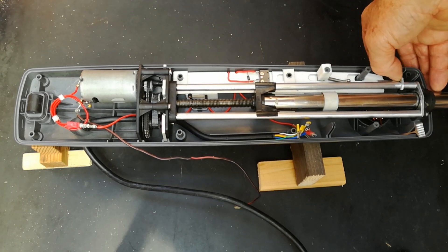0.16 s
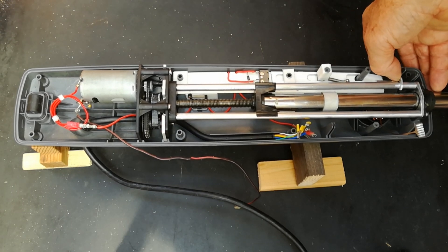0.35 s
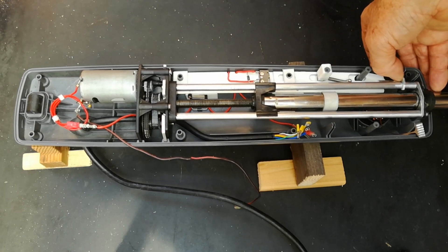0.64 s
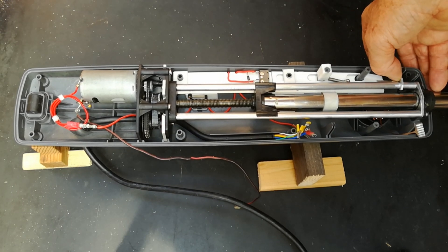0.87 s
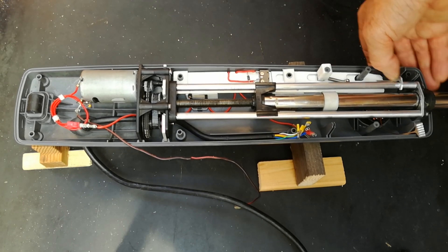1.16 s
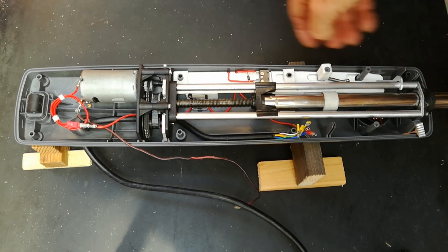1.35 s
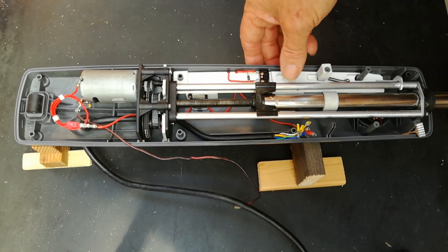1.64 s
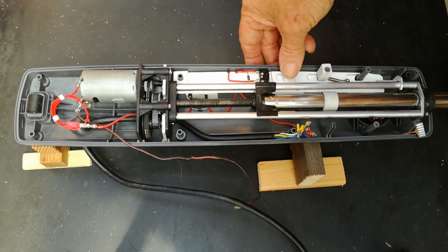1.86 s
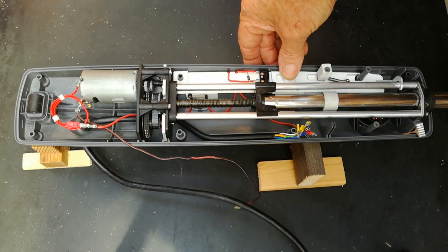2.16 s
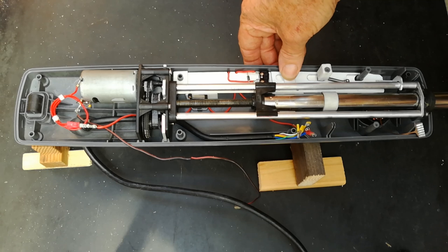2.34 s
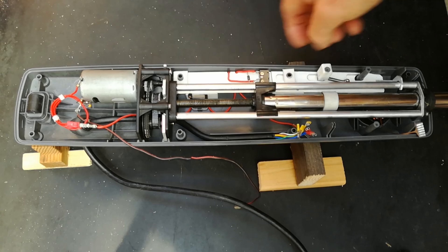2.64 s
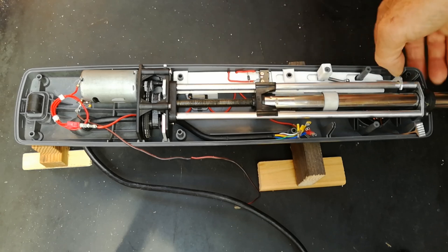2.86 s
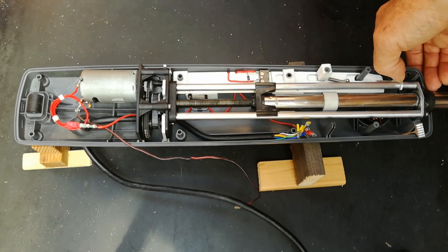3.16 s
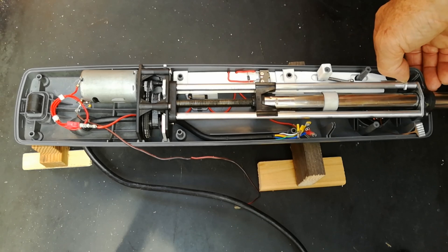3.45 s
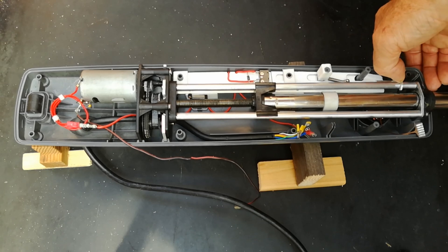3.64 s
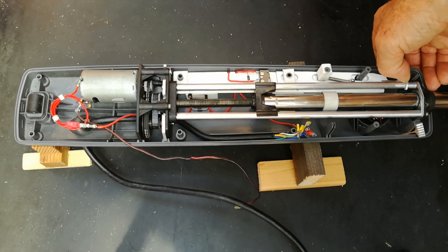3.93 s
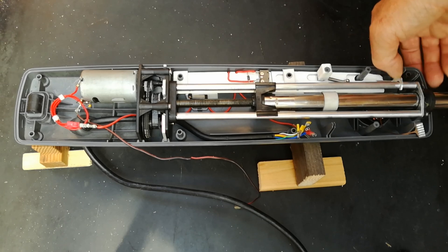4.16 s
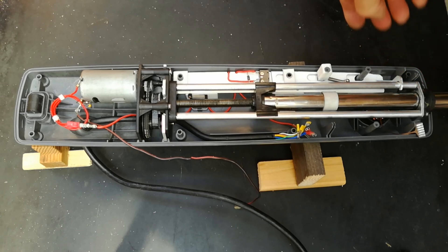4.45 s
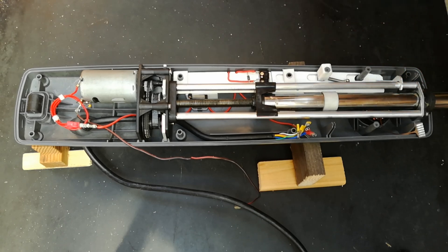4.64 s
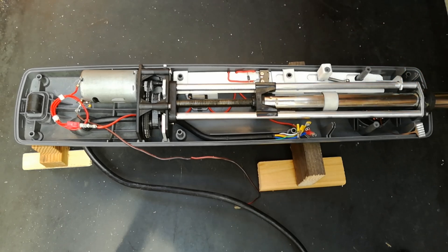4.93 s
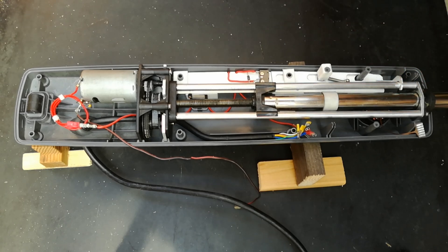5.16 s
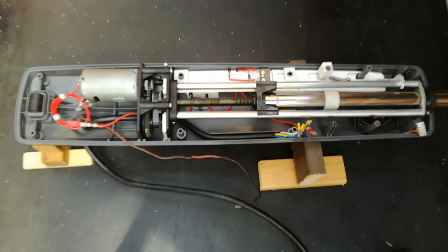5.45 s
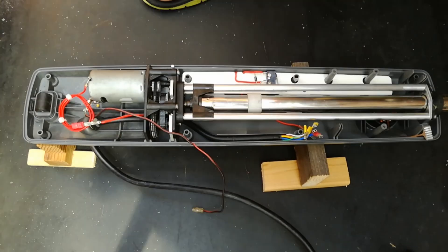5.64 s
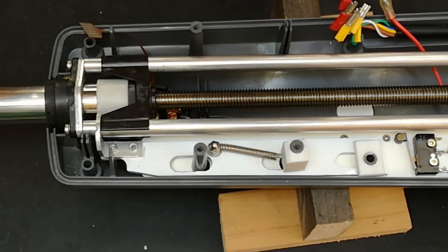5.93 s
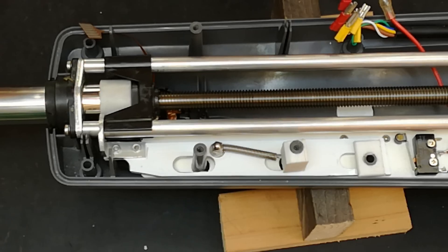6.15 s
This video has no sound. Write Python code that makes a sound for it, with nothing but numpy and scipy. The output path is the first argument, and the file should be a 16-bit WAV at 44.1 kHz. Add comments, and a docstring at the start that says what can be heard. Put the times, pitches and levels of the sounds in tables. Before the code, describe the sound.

A finger pushes a sliding plate, scraping and snapping repeatedly; after quiet and handling thumps, a small electric gear motor whirs up and down.

```python
"""Scrapes and sharp snaps come first: a finger pushes the sliding plate of an opened tiller drive on a workbench.
The plate rubs as filtered noise; snaps, ticks and knocks strike banks of resonances, among faint thin whistles.
Bumps and low thumps follow on the phone above, and the sound drops out for a moment.
Then the motor starts: a gliding tooth-mesh whine and rattle, speeding up and slowing.
A small room adds a short tail and one soft echo, over a quiet bed of murmur and hiss."""
import sys
import numpy as np
from scipy import signal
from scipy.fft import rfft, irfft, next_fast_len
from scipy.io import wavfile
from scipy.ndimage import uniform_filter1d

SR = 44100
rng = np.random.default_rng(int(sys.argv[2]) if len(sys.argv) > 2 else 0)


def pcm_store(signal):
    """Save signal as 16-bit PCM."""
    levels = np.round(np.clip(np.atleast_2d(signal), -1, 1) * 32767)
    wavfile.write(sys.argv[1], SR, levels.astype(np.int16).T)


N = 277830
TIME = np.arange(N) / SR
HIT = TIME[:8192]  # time axis of one short sound


def amp(db):
    """Decibels to gain."""
    return 10 ** (np.asarray(db) / 20)


def unit(x):
    """Scale to rms 1."""
    return x / np.sqrt(np.mean(x ** 2))


def blow(x):
    """Scale a hit to the energy of 10 ms at rms 1."""
    energy = np.mean(np.sum(x ** 2, axis=-1))
    return x * np.sqrt(.01 * SR / energy)


def pan(db):
    """Left and right gains of constant power; db is left minus right."""
    return unit(amp([[db / 2], [-db / 2]]))


def add(out, s, x):
    """Mix a short sound in at time s."""
    i = int(s * SR)
    out[:, i:i + x.shape[-1]] += x[..., :N - i]


def colour(x, points):
    """Causal minimum-phase filter through (Hz, dB) points."""
    n = next_fast_len(x.shape[-1] + 2048, True)
    hz, db = np.transpose(points)
    bin_hz = np.arange(n // 2 + 1) * SR / n
    log_gain = np.log(amp(np.interp(np.log(bin_hz + 1), np.log(hz), db)))
    # folding the cepstrum onto positive time makes the filter causal
    cepstrum = irfft(log_gain, n) * (1 + np.sign(n / 2 - np.arange(n)))
    cepstrum[0] /= 2
    response = np.exp(rfft(cepstrum))
    return irfft(rfft(x, n) * response, n)[..., :x.shape[-1]]


def ring(x, modes):
    """Sum of resonances (Hz, width Hz, dB) driven by x."""
    total = 0
    for hz, width_hz, db in modes:
        b, a = signal.iirpeak(min(hz, .45 * SR), hz / width_hz, SR)
        total = total + amp(db) * signal.lfilter(b, a, x + 1e-18)
    return total


def lowpass(x, hz, order=2):
    """Remove the treble above hz."""
    sos = signal.butter(order, min(hz, .45 * SR), fs=SR, output="sos")
    return signal.sosfilt(sos, x + 1e-18)


def noise(n, alike_hz):
    """White noise at two ports: alike well below alike_hz, unrelated well above."""
    mid, side = rfft(rng.standard_normal((2, n)))
    bin_hz = np.arange(n // 2 + 1) * SR / n
    alike = 1 / (1 + (bin_hz / alike_hz) ** 2)
    opposite = np.array([[1], [-1]])
    return irfft(mid * np.sqrt(1 + alike) + side * np.sqrt(1 - alike) * opposite, n)


def room(x, wet_db, echo_db, t60_s, treble_t60_s=0.064, echo_s=.031, build_s=0.0034):
    """Bench and walls scatter the sound into a short tail; the ceiling returns one soft echo."""
    scatter = noise(2 * len(HIT), alike_hz=900)
    t = TIME[:scatter.shape[1]]
    low = lowpass(scatter, 2800, order=1)
    treble = scatter - low
    tail = low * amp(-60 * t / t60_s) + treble * amp(-60 * t / treble_t60_s)
    tail = tail * (1 - np.exp(-t / build_s))
    echo = low * np.exp(-((t - echo_s) / 0.0088) ** 2)
    response = (amp(wet_db) * unit(tail) + amp(echo_db) * unit(echo)) / np.sqrt(len(t))
    return x + signal.fftconvolve(x, response, axes=1)[:, :N]


# tone of the quiet air: frequency_hz, gain_db
AIR_COLOUR = [(12, -37), (20, -4.5), (49, -3), (101, -9), (149, -11), (226, -15.5), (307, -16), (417, -25),
              (1080, -18.5), (1310, -22.5), (1420, -21.5), (1880, -25), (4710, -29), (8220, -37.5),
              (15600, -39.5)]
AIR_DB, HISS_DB = -65.5, -89.0


def background():
    """The quiet workshop: a low murmur of air that wavers slightly, and a thin steady hiss."""
    waver_db = .6 * np.interp(TIME, np.arange(64) / 10, rng.standard_normal(64))
    air = unit(colour(noise(N, alike_hz=256), AIR_COLOUR)) * amp(AIR_DB + waver_db)
    return air + amp(HISS_DB) * rng.standard_normal((2, N))


def swell(crest_s, db, rise_s, fall_s):
    """A rounded rise to a crest and a rounded fall."""
    t = TIME - crest_s
    return amp(db) * np.exp(-(t / np.where(t < 0, rise_s, fall_s)) ** 2)


# the phone rocks: start_s, level_db, pitch_hz, decay_s, right_port_lag_s
PHONE_THUMPS = [(5.3681, -28, 63, 0.012, 0.00069), (5.389, -38.5, 74, .016, .0018),
                (5.388, -38.5, 423, .008, 0.003)]
# low swells of air and handling: crest_s, level_db, rise_s, fall_s
RUMBLE_SWELLS = [(1.44, -46, 0.06, 0.075), (4.15, -55.5, .025, 0.084), (5.42, -50, .012, 0.18)]


def handling():
    """The phone rocks on its mount in decaying sines; moving air and handling rumble as low noise."""
    out = np.zeros((2, N))
    for s, db, hz, decay_s, lag_s in PHONE_THUMPS:
        t = np.maximum(HIT - np.array([[0], [lag_s]]), 0)
        add(out, s, amp(db) * np.sin(2 * np.pi * hz * t) * np.exp(-t / decay_s))
    rumble_colour = [(20, -8), (45, -1), (58, -4), (75, -14.5), (130, -28), (400, -45.0), (2000, -87)]
    rumble = unit(colour(rng.standard_normal(N), rumble_colour))
    return out + rumble * sum(swell(*row) for row in RUMBLE_SWELLS)


# fingers bump the phone: start_s, level_db, decay_s, centre_hz, width_hz, left_minus_right_db
PHONE_BUMPS = [(5.3655, -40, 0.0024, 1200, 3000, 10), (5.3756, -27.5, 0.000093, 8500, 3500, -38),
               (5.376, -41.5, 0.0014, 2200, 4000, 9), (5.3876, -48.5, .0012, 1000, 1510, 7.5),
               (5.3906, -39.5, 0.0028, 2970, 4990, 16), (5.3918, -34, 0.0061, 1290, 2500, 14),
               (5.3956, -26.5, 0.00018, 5530, 4470, -23)]
# resonances of the phone's case: centre_hz, width_hz, gain_db
PHONE_CASE_MODES = [(1230, 39, 4), (3400, 18, -4.5), (4020, 16, 0.5), (5290, 23, 3), (9900, 22, -13.5)]


def bumps(ring_db=-21, strike=6):
    """Fingers strike and scuff right at the microphone ports; the phone's case rings."""
    out = np.zeros((2, N))
    for s, db, decay_s, hz, width_hz, pan_db in PHONE_BUMPS:
        scuff = noise(len(HIT), alike_hz=500) * np.exp(-HIT / decay_s)
        force = strike * signal.unit_impulse(len(HIT)) + scuff
        click = blow(lowpass(ring(force, [(hz, width_hz, 0)]), 11500, order=4))
        case = blow(ring(force, PHONE_CASE_MODES))
        add(out, s, amp(db) * (pan(pan_db) * click + amp(ring_db) * case))
    return out


# faint thin whistles, source unclear: start_s, end_s, level_db, top_pitch_hz
FAINT_WHISTLES = [(.47, .61, -75, 3780), (0.907, 1.067, -75, 3330), (1.528, 1.658, -74, 3900),
                  (1.691, 1.76, -76, 3970), (1.781, 1.917, -83, 4000), (2.391, 2.512, -70.5, 3770),
                  (3.511, 3.648, -71, 2360), (3.506, 3.638, -70, 3280), (3.587, 3.696, -66, 3850)]


def whistles(flutter_hz=90, pan_db=-3, arch=.035):
    """Thin fluttering tones whose pitch arches up a little as they swell."""
    out = np.zeros((2, N))
    for start, end, db, hz in FAINT_WHISTLES:
        arc = np.sin(np.pi * np.minimum(HIT / (end - start), 1))
        phase = 2 * np.pi * np.cumsum(hz * (1 + arch * (arc - 1))) / SR
        flutter = unit(lowpass(rng.standard_normal((2, len(HIT))), flutter_hz))
        add(out, start, amp(db) * pan(pan_db) * arc * unit(flutter * np.sin(phase)))
    return out


# light metal ticks: start_s, level_db, ring_hz
METAL_TICKS = [(.070, -67, 1880), (2.523, -57.5, 3950), (2.526, -59, 2000), (3.145, -67, 3550),
               (5.818, -65.5, 4850), (5.842, -63, 4740), (5.868, -67.5, 5000)]


def ticks(contact_s=0.0078, width_hz=300, housing_db=-3, pan_db=-2):
    """Small metal parts touch and ring briefly; the housing answers."""
    out = np.zeros((2, N))
    for s, db, hz in METAL_TICKS:
        force = noise(len(HIT), alike_hz=1530) * np.exp(-HIT / contact_s)
        tick = ring(force, [(hz, width_hz, 0), (880, 100, housing_db)])
        add(out, s, amp(db) * pan(pan_db) * blow(tick))
    return out


# tone of the plate rubbing in its guide: frequency_hz, gain_db
SCRAPE_COLOUR = [(240, -40.5), (400, -16.5), (496, -23), (655, -26), (994, -6.5), (1490, -5.5), (1650, -2),
                 (2120, -13.5), (3470, -3.5), (4730, -10), (7870, -19.5), (16000, -37)]
CATCH_DB = 3.5  # rms unevenness of the rub


def scrape(length_s, db, swell_db, pan_db=-4, grip_s=0.0042):
    """The plate rubs along its guide in tiny catches; db is the level halfway, swell_db the whole change."""
    along = HIT / length_s
    catches = amp(CATCH_DB * unit(lowpass(rng.standard_normal(len(HIT)), 450)))
    rub = unit(colour(catches * noise(len(HIT), alike_hz=1300), SCRAPE_COLOUR))
    pressure = amp(db + swell_db * (np.minimum(along, 1) - 0.5))
    grip = (1 - np.exp(-HIT / grip_s)) * (along < 1)
    return rub * pan(pan_db) * pressure * grip


# each push scrapes the plate, then snaps the switch (also played by switch, which trims snap_level_db):
# snap_s, snap_level_db, tilt_db_per_octave, left_minus_right_db, scrape_lead_s, scrape_level_db, scrape_swell_db
PUSHES = [(0.119, -32.5, -1.7, -4.5, 0.044, -57, 21), (0.3603, -29.5, 0.3, -7.0, .021, -58.5, 5.5),
          (0.635, -33, -2.5, -5, 0.039, -53, 0), (0.8708, -28.5, -0.5, -5.5, .017, -51.5, 7),
          (1.064, -30, -4.5, -5.5, .04, -51.5, 20), (3.1847, -29, 0.6, -5, .017, -60, 14),
          (3.4876, -32, -2, -5, .062, -56, 9), (3.692, -28, 1.1, -7, .02, -57, 8),
          (4.0056, -31.5, -4, -8, 0.067, -58, 7)]
# the plate slides on after a push and comes to rest: start_s, length_s, scrape_level_db (ringing adds to it)
PLATE_SETTLES = [(1.08, .11, -64.5), (3.515, 0.13, -72.5)]
# what the sliding plate sings with, passed through twice: centre_hz, width_hz, gain_db (each per pass)
PLATE_RESONANCES = [(838, 63, 0.5), (1400, 30, -2), (1890, 63, -1.5), (2160, 20, -7), (2340, 25, -3),
                    (3260, 33, -1), (4540, 40, -10), (4670, 25, -7)]
OVERRUN_S = .007  # a scrape runs on just past the snap
SETTLE_FADE_DB, PLATE_RING_DB = -17, -2.5


def slides():
    """The plate scrapes up to every snap, mostly harder as the spring loads; twice it slides to rest, ringing."""
    out = np.zeros((2, N))
    for s, *_, lead_s, db, swell_db in PUSHES:
        add(out, s - lead_s, scrape(lead_s + OVERRUN_S, db, swell_db))
    for s, length_s, db in PLATE_SETTLES:
        rub = scrape(length_s, db, SETTLE_FADE_DB)
        song = unit(ring(ring(rub, PLATE_RESONANCES), PLATE_RESONANCES))
        add(out, s, rub + amp(PLATE_RING_DB) * np.std(rub) * song)
    return out


# the plate knocks on the housing: start_s, level_db, softness_cutoff_hz
PLATE_KNOCKS = [(.144, -50.5, 790), (.661, -63, 800), (1.044, -61, 2000), (1.0758, -35, 2330),
                (2.447, -51.5, 1090), (2.459, -57, 1620), (2.946, -68.5, 1770), (3.457, -59, 3000),
                (3.976, -54.5, 2400), (4.027, -42, 1310), (4.145, -67.5, 1500)]
# resonances of the plastic housing: centre_hz, width_hz, gain_db
HOUSING_RESONANCES = [(532, 15, -5.5), (823, 19.6, 10.5), (1000, 91, 0), (1270, 160, 5.5), (1668, 51, 12.5),
                      (1920, 99, -2), (2550, 160, -35)]


def knocks(contact_s=0.0013, grit_db=-14, clack_db=-8, edge_db=-21, pan_db=-3):
    """The plate meets its stop with a dry clack and rings the plastic housing; soft contacts are dull."""
    out = np.zeros((2, N))
    for s, db, soft_hz in PLATE_KNOCKS:
        grit = noise(len(HIT), alike_hz=980) * np.exp(-HIT / contact_s)
        impact = blow(signal.unit_impulse(len(HIT))) + amp(grit_db) * blow(grit)
        force = lowpass(impact, soft_hz, order=3)
        body = blow(colour(ring(force, HOUSING_RESONANCES), [(250, -45), (600, -5)]))
        clack = blow(colour(force, [(350, -21.5), (650, 8)]))
        edge = blow(ring(grit, [(4500, 4000, 0)]))
        knock = blow(body + amp(clack_db) * clack + amp(edge_db) * edge)
        add(out, s, amp(db) * pan(pan_db) * knock)
    return out


# switch and plate resonances: centre_hz (before the random shift), width_hz, gain_db
SWITCH_RESONANCES = [(1486, 206, -2.5), (1750, 140, -8), (2810, 150, -6), (3170, 190, -8), (5030, 160, 0.5),
                     (5435, 240, 4), (7050, 370, -0.5), (7820, 170, -7), (9450, 280, 2),
                     (13200, 1200, -9.5)]
# tone of the dry crack: frequency_hz, gain_db
CRACK_COLOUR = [(240, -68), (400, -31.5), (1400, -13), (1820, 2.5), (2220, -17), (2800, 4), (4510, -7.5),
                (5430, -4.5), (6240, -11.5), (6740, -2.5), (9320, -9.5), (11400, -29), (16000, -30)]
SNAP_TRIM_DB = -7.5  # added to every snap level


def switch(chatter_s=0.0051, rise_s=0.0003, crack_db=0, buzz_db=-19, buzz_s=0.026, spread=0.039):
    """The spring snaps over, chatters and rings the plate; each snap's resonances shift slightly at random."""
    out = np.zeros((2, N))
    for s, db, tilt_db, pan_db, *_ in PUSHES:
        chatter = np.exp(-(HIT / chatter_s) ** 2)
        buzz = amp(buzz_db) * np.exp(-HIT / buzz_s)
        force = noise(len(HIT), alike_hz=1320) * (chatter + buzz) * (1 - np.exp(-HIT / rise_s))
        modes = [(hz * (1 + spread * rng.standard_normal()), width_hz, gain_db)
                 for hz, width_hz, gain_db in SWITCH_RESONANCES]
        body = blow(colour(ring(force, modes), [(400, -10.5), (1100, 6)]))
        crack = blow(colour(force, CRACK_COLOUR))
        snap = body + amp(crack_db) * crack
        snap = colour(snap, [(1000, -2 * tilt_db), (16000, 2 * tilt_db)])  # four octaves of tilt
        add(out, s, amp(db + SNAP_TRIM_DB) * pan(pan_db) * blow(snap))
    return out


MOTOR_ON_S, MOTOR_ATTACK_S = 6.041, 0.0031  # the teeth engage
SLACK_S, SLACK_DB = .013, -19  # just before, the gears quietly take up their play
MOTOR_DB, MOTOR_REF_HZ, MOTOR_DB_PER_OCTAVE = -32, 1520, 6  # level at that meshing rate; faster is louder


def effort(mesh_hz):
    """The motor's strength: the play is taken up, the teeth engage, then the level follows the speed."""
    slack = amp(SLACK_DB) * np.clip((TIME - MOTOR_ON_S) / SLACK_S + 1, 0, 1)
    engaged = np.clip((TIME - MOTOR_ON_S) / MOTOR_ATTACK_S, 0, 1)
    level_db = MOTOR_DB + MOTOR_DB_PER_OCTAVE * np.log2(mesh_hz / MOTOR_REF_HZ)
    return np.maximum(slack, engaged) * amp(level_db)


# speed of the gear train before jitter: time_s, tooth_mesh_hz
MESH_SPEED = [(6.04, 824.1), (6.084, 1411), (6.122, 1893), (6.15, 1804), (6.166, 1578), (6.218, 1168),
              (6.254, 1013), (6.288, 1674), (6.3, 1738)]
# tone of the gearbox rattle: frequency_hz, gain_db
RATTLE_COLOUR = [(24, -41), (40, -17), (96, -5), (151, -19), (372, -18.5), (467, -17), (646, -20),
                 (873, -4), (1240, -3), (2150, -8.5), (2570, -4), (3830, -8.5), (8990, -35.5), (14800, -39),
                 (16000, -44)]
# resonances of the gearbox: centre_hz, width_hz, gain_db
GEARBOX_RESONANCES = [(868, 30, -3.5), (994, 75, -2.5), (1110, 46, -1), (1240, 140, -1), (1550, 66, 5),
                      (1950, 120, -18), (2636, 66, 1), (3040, 63, 4), (3280, 53, 1), (3860, 130, 1),
                      (4380, 180, -2)]
# stereo lean of the gears: frequency_hz, left_minus_right_db
GEAR_LEAN = [(60, -0.5), (1300, 0.5), (2400, -2), (4400, -5), (8100, -7.5), (15000, 5)]
GEAR_JITTER, GEAR_ROUGH_DB = .011, 2.8  # rms wobble of speed (fraction) and of tooth load
WHINE_DB, COAST_WHINE_DB = -6.5, 1.5  # whine over rattle; it stands out more while the gears slow down


def motor(second_db=-12, modes_db=-3, bright=0.85, uneven=0.12, teeth=14):
    """Gear teeth mesh with a gliding whine and rattle the gearbox; faster teeth strike brighter."""
    mesh_hz = np.interp(TIME, *np.transpose(MESH_SPEED))
    slowing = uniform_filter1d(1. * (np.gradient(mesh_hz) < 0), size=1024)
    whine_db = WHINE_DB + COAST_WHINE_DB * slowing
    wobble = unit(lowpass(rng.standard_normal(N), 138))
    phase = 2 * np.pi * np.cumsum(mesh_hz * (1 + GEAR_JITTER * wobble)) / SR
    # the load changes over a turn of the pinion and from tooth to tooth
    turn = 1 + uneven * np.cos(phase / teeth)
    roughness = amp(GEAR_ROUGH_DB * unit(lowpass(rng.standard_normal(N), 305)))
    load = unit(turn * roughness)
    force = (1 + np.cos(phase)) * load * noise(N, alike_hz=1520)
    ringing = ring(force, GEARBOX_RESONANCES)
    ringing = unit(colour(ringing, [(450, -15.5), (850, 1.5), (5000, -5.5), (12000, -7.0)]))
    rattle = unit(unit(colour(force, RATTLE_COLOUR)) + amp(modes_db) * ringing)
    dull = lowpass(rattle, 1600, order=1)
    rattle = dull + (rattle - dull) * (mesh_hz / 1500) ** bright
    tones = np.sin(phase) + amp(second_db) * np.sin(2 * phase)
    whine = np.sqrt(2) * amp(whine_db) * load * tones
    gears = np.array([colour(x, [(hz, side * db / 2) for hz, db in GEAR_LEAN])
                      for x, side in zip(rattle + whine, (1, -1))])
    return gears * effort(mesh_hz)


def scene():
    """The drive in its room, with the phone's own noises close by."""
    clicks = room(switch() + ticks() + slides() + whistles(), wet_db=-9, echo_db=-24.5, t60_s=0.16)
    housing = room(knocks(), wet_db=-12, echo_db=-41, t60_s=0.18)
    gears = room(motor(), wet_db=-8.0, echo_db=-37, t60_s=0.11)
    phone = room(bumps(), wet_db=-31.5, echo_db=-37.0, t60_s=0.37)
    return clicks + housing + gears + phone + handling() + background()


DROPOUT_START_S, DROPOUT_END_S = 5.602, 5.659
TOP_HZ = 16200


def record(dry):
    """The sound drops out briefly; the phone steeply cuts the treble above TOP_HZ."""
    live = (TIME < DROPOUT_START_S) | (TIME > DROPOUT_END_S)
    top_cut = signal.ellip(8, .2, 70, TOP_HZ, fs=SR, output="sos")
    return signal.sosfilt(top_cut, dry * live)


dry = scene()
out = record(dry)
pcm_store(out)
```